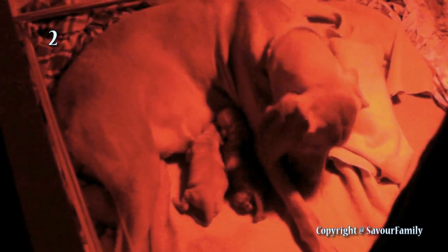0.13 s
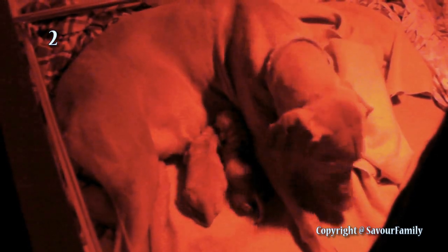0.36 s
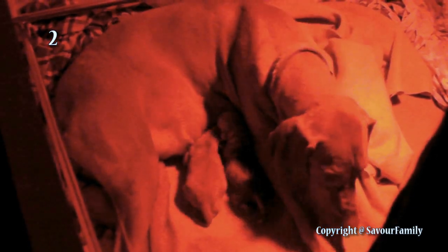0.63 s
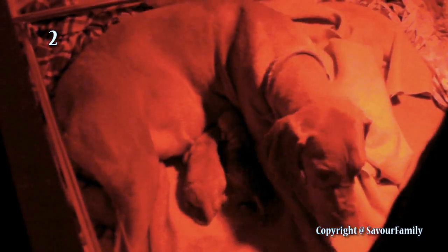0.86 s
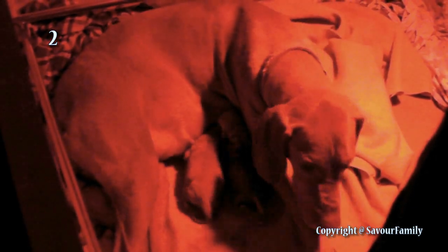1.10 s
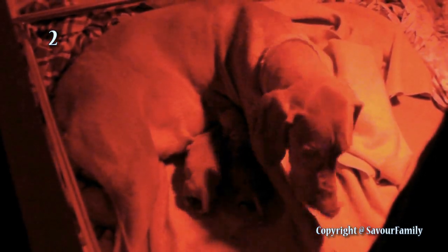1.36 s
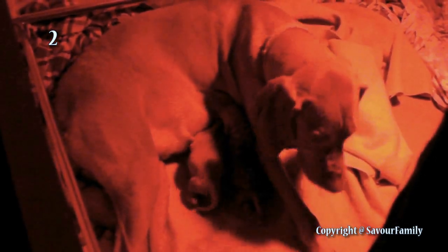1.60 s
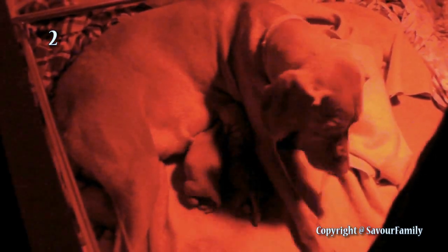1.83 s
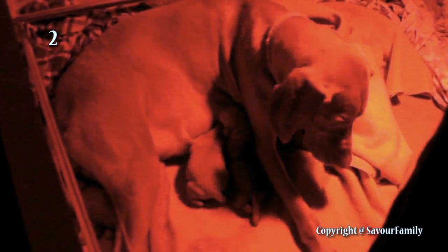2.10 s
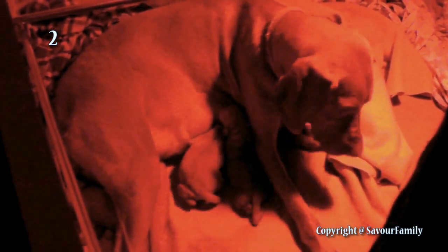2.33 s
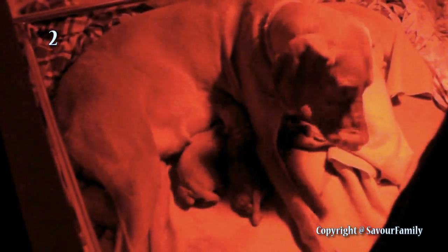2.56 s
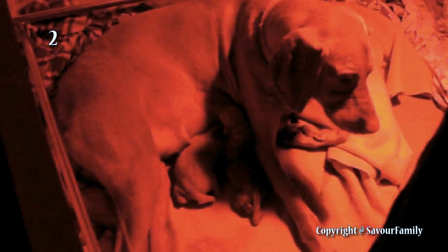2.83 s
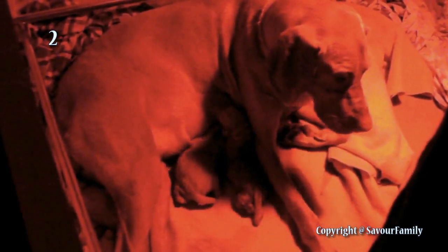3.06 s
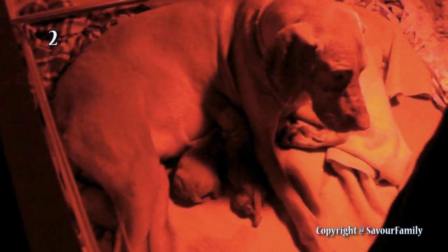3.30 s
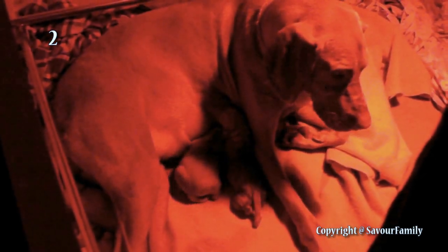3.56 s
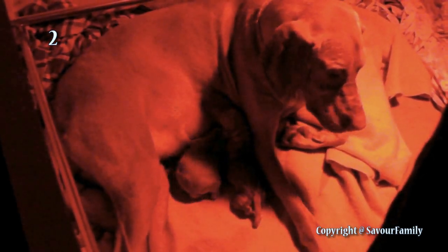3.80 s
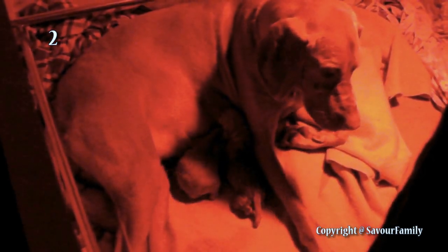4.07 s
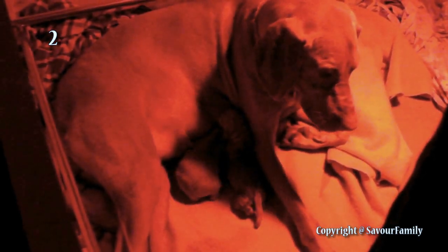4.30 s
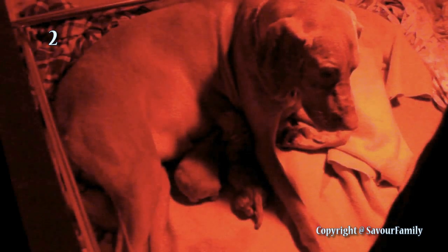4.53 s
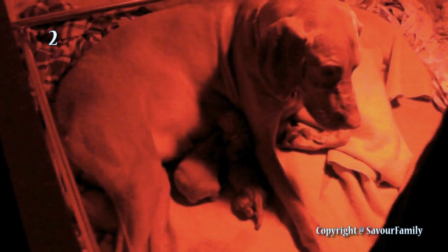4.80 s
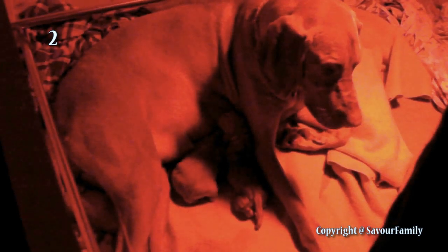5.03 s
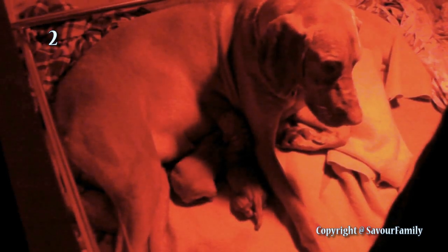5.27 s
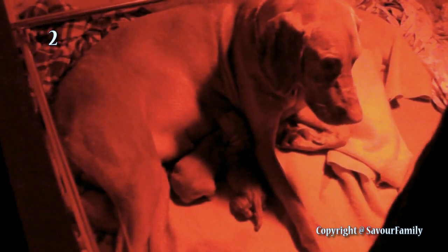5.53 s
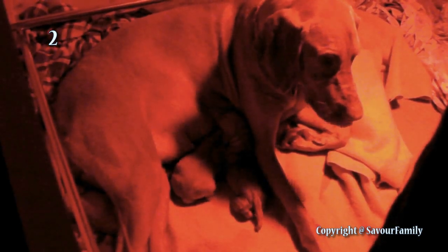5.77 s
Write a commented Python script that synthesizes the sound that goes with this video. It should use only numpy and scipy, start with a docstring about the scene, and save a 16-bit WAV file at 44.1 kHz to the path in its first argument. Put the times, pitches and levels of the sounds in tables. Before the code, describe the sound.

In a quiet indoor whelping box, the tail of an earlier cry fades under faint hiss and bedding rustle. A newborn puppy gives two brief hoarse mewls, then four longer wavering whimpers with small gulps, ending in a faint rising squeak. Light claw and tongue ticks and dull soft bumps come between. The microphone is close, the puppy central, with a slight boxy room ring.

```python
"""An earlier cry dies away over room noise, mains hum and rustling bedding in a whelping box.
A newborn puppy then mewls: two short cries, four long ones and a faint rising tail.
Its voice is a gliding harmonic stack with hoarse starts, brief dips, gulps and faint peeps; box and room ring on.
Decaying noise makes ticks of claws, tongue and bedding; decaying sines make paw or flank thumps."""
import sys
import numpy as np
from scipy import signal
from scipy.fft import rfft, irfft, next_fast_len
from scipy.io import wavfile
from scipy.ndimage import uniform_filter1d

SR = 44100
rng = np.random.default_rng(int(sys.argv[2]) if len(sys.argv) > 2 else 0)


def wav_out(sig):
    """Save sig, one row per channel (or a flat mono array), as 16-bit PCM at SR to the path in sys.argv[1]."""
    wavfile.write(sys.argv[1], SR, np.round(np.clip(np.atleast_2d(sig).T, -1, 1) * 32767).astype(np.int16))


def to_linear_factor(level_db):
    """Convert decibel levels (scalar or array-like) to linear amplitude factors."""
    exponent = np.asarray(level_db, float) / 20
    return 10 ** exponent


N = 259749

# room noise and hiss, relative density: freq_hz, density_db
AIR = [(18, -59), (30, -25), (95, -2), (287, -7), (415, 0.5), (684, -7.5), (1220, -18), (4780, -20),
       (7870, -27.5), (13700, -15), (16000, -30)]
# bedding rustle: time_s, level_db
RUSTLE = [(0.0, -57), (0.18, -62), (1.0, -65), (1.21, -57.5), (1.4, -57.5), (1.48, -63.5), (1.6, -58.5),
          (2.46, -61), (2.94, -54.5), (2.97, -60), (5.89, -60.5)]
# rustle spectrum, relative density: freq_hz, density_db
RUSTLE_COLOUR = [(800, -1), (2500, 0.5), (5000, 0), (15000, -6.5)]
# left-right likeness of the noises: freq_hz, correlation
LIKENESS = [(60, 0.29), (400, 0.54), (1500, 0.27), (6000, 0.011)]
# pitch and mouth track, one table per phrase: time_s, pitch_hz, effort_db, overtone_lift_db
CRIES = [
    [(.427, 430, -60, -20), (.441, 380.8, -43.5, -26), (.48, 338.4, -43, -8), (.505, 334, -41.5, -1),
     (.525, 357.3, -38.5, -7), (.546, 255.1, -32.5, -9.5), (.565, 265, -37.5, -8)],
    [(.984, 456.4, -48, -23), (1.006, 412.8, -46, -27), (1.028, 307, -48, -3), (1.046, 352.6, -38.5, -3),
     (1.09, 333, -46, 2), (1.105, 300, -33.5, -6.5), (1.12, 290, -32, -11)],
    [(1.582, 688, -53, -3), (1.608, 692, -51.5, 6), (1.625, 438, -54, -1), (1.655, 391.7, -52, 5),
     (1.685, 361.3, -53.5, 11.5), (1.735, 383.3, -47.5, 5.5), (1.8, 377, -45, 8.5), (1.828, 372.4, -45, 3),
     (1.854, 335.5, -37.5, 0), (1.878, 305.6, -47, 3.5), (1.95, 298.2, -37.5, -5.5)],
    [(2.392, 455, -50, -15), (2.408, 458.6, -51, -26), (2.434, 342, -44.5, 2.5), (2.462, 351, -38, -2),
     (2.494, 334, -40.5, 3.5), (2.522, 317, -44, 1.5), (2.546, 337.2, -43.5, 8), (2.568, 367, -39.5, 1),
     (2.588, 351.7, -38.5, -15), (2.622, 352.2, -32.5, -2), (2.668, 333.5, -41, 1), (2.738, 295.4, -35, -3),
     (2.78, 296.6, -32, -4), (2.872, 269.3, -65, 8), (2.9, 267.2, -31, -8), (2.94, 245.8, -31.5, -17.5)],
    [(3.32, 481.5, -46.5, -28), (3.348, 339.5, -34, -13), (3.424, 365.3, -42, -5.5),
     (3.466, 397.5, -41.5, -1), (3.488, 407.3, -37.5, -12), (3.58, 418.1, -38.5, 2),
     (3.612, 406.4, -38, -8), (3.62, 391, -38.5, 4), (3.68, 302.7, -37.5, -1.5), (3.725, 257.9, -41, -2.5),
     (3.82, 250.5, -43, -2.5), (3.848, 237.5, -48.5, -3), (3.91, 283.5, -47, 6), (3.958, 320.3, -52, 4.5),
     (4.035, 293.1, -43, 2.5), (4.048, 250, -39, -6.5)],
    [(4.597, 605.5, -52.5, -3), (4.629, 444.6, -45, -2.5), (4.661, 397.4, -45, -5), (4.724, 356.3, -44, 3),
     (4.8, 349.6, -36.5, -5), (4.87, 357.2, -39.5, 0), (4.897, 358, -55, 6), (4.909, 349, -38.5, 0),
     (4.946, 370.7, -48, 9), (5.02, 368.3, -42, 4.5), (5.07, 348.4, -39.5, 3.5), (5.09, 372, -39.5, -4),
     (5.108, 382, -36, -1), (5.128, 389.3, -34, -8), (5.155, 380.7, -34, -0.5), (5.176, 376, -34, -3.5),
     (5.196, 341.7, -37.5, 1), (5.212, 315.3, -40, -1), (5.286, 310.7, -43.5, 2), (5.39, 288, -34.5, -4),
     (5.425, 288, -64.5, 15), (5.445, 282.4, -48.5, 6)],
    [(5.464, 388.8, -56, -2), (5.485, 408.5, -48, 3), (5.518, 454.7, -48, -3), (5.592, 522.6, -52, -3)],
]
# hoarseness, one row per phrase: settled_0_to_1, settle_s
SETTLED = [(.22, .05), (.1, .04), (.07, .01), (.1, .04), (.1, .14), (.08, .01), (.3, .03)]
# lift of harmonics 4-9, one value per phrase: lift_db
BRIGHT_DB = [4, 3, 8, 4.5, 5.5, 1, 6]
# lift of harmonic 3, one value per phrase: lift_db
THIRD_DB = [1.5, 7, 0, 1.5, -0.5, -3, -13]
# throat and head radiation of harmonics 1-3: freq_hz, gain_db
HEAD = [(250, -29.5), (300, -23.5), (345, -8), (400, 7.5), (520, 3.5), (700, 1), (830, -9.5), (920, -5),
        (1100, -12), (1270, -11), (1450, -27)]
# colour of harmonics 4-9: freq_hz, gain_db
NASAL = [(900, 3.5), (1250, -17), (1500, -25), (1680, -27), (1850, -21), (2300, -30), (2700, -31),
         (3300, -41)]
# brief dips in the voice's level and pitch: centre_s, level_change_db, pitch_dip_share
DIPS = [(.998, -11, 0.011), (1.719, -9, 0.0099), (1.773, -25, 0.044), (3.345, -9.5, 0.031),
        (3.437, -4, 0.013), (4.699, -5, 0.017), (4.966, -8, 0.0028), (5.043, -25, 0.02),
        (5.105, -7, 0.0084), (5.18, -15, 0.0047)]
# gulps, a few cycles of the closed throat: time_s, level_db, pitch_hz, cycles
GULPS = [(0.48, -30, 449, 1.44), (1.015, -33.5, 449, 2.3), (1.36, -41, 460, 1), (1.029, -32, 452, 1.4),
         (1.947, -30, 406, 1.45), (2.207, -29.5, 490.5, 0.82), (2.927, -32.5, 453, 2.04),
         (3.419, -29.5, 492.6, 1.26), (4.044, -33.5, 413, 1.8), (5.455, -39, 582.8, 1.9),
         (5.663, -52, 529.4, 2.8), (5.765, -46, 475.6, 1.5)]
# faint short tones: start_s, peak_db, pitch_hz, length_s
PEEPS = [(1.185, -58.5, 2760, 0.046), (5.804, -43.5, 893, 0.015), (5.803, -57.5, 2200, 0.01),
         (5.806, -55, 2750, 0.0096), (5.876, -56, 2050, 0.0079)]
# air modes of the whelping box: freq_hz, added_gain_db, t60_s
BOX = [(358, 7, 0.3), (742, -3, 0.5), (1110, -4, 0.4)]
# room decay: freq_hz, t60_s
ROOM_T60 = [(250, 0.69), (600, 0.73), (1200, 0.94), (5000, 0.06)]
# ticks of claws, tongue and bedding: start_s, level_db, centre_hz
TICKS = [(1.268, -46, 6000), (1.301, -45, 4390), (1.3087, -44, 4300), (1.346, -42, 5050),
         (1.394, -46, 4554), (1.402, -51, 12540), (1.698, -39, 8300), (2.0912, -50, 3920),
         (2.13, -47.5, 7600), (2.283, -46, 5880), (2.3458, -48.5, 4360), (2.7267, -47, 3454),
         (2.7826, -49.5, 7030), (2.8893, -37, 6760), (3.625, -43.5, 5060), (3.815, -45.5, 5180),
         (3.8465, -40.5, 2898), (4.0644, -49, 9300), (5.659, -46.5, 4930)]
# paw or flank on the box: start_s, level_db, pitch_hz
THUMPS = [(1.398, -49.5, 212), (1.619, -54.5, 183), (2.21, -48.5, 217), (4.611, -58, 90.5)]
# echo path lengths, rows for middle and sides: twelve delays_ms each
PATHS_MS = np.geomspace(9, 61, 24).reshape(12, 2).T

AIR_DB, HUM_DB, HUM_HZ = -61.5, -75, 100
CRACKLES_PER_S, CRACKLE_S = 37, 0.012
CRACKLE_DB, CRACKLE_SPREAD_DB = -14, 3.5  # level against the rustle; scale of the uneven sizes
LAST_CRY_DB, ROOM_DB, ROOM_WIDTH = -52, -22.5, 0.16
RAW_START = .6  # hoarseness at each phrase start
SLACK_HZ, SLACK_PER_HZ, SLACK_MOST = 290, .008, .22  # slack folds add hoarseness below SLACK_HZ
MOUTH_GROWS, MOUTH_UPPER = 0.48, 1.35  # extra mouth share in harmonic 3; mouth share in 4-9
UPPER_DB, HOARSE_DULLS_DB = -8.5, -16  # harmonics 4-9: base level; change at hoarseness 1
WARM_DB, WARM_S = -9.5, 0.11  # harmonics above 2 start weaker and grow in
DIP_S, DIP_OVERTONES = 0.01157, .35  # Gaussian half length; share felt by overtones
HAZE_DB = -30
TOP_HZ = 16200


def rms_one(x):
    """Scales to rms 1."""
    return x / np.sqrt(np.mean(x ** 2) + 1e-20)


def in_time(rows):
    """Table columns interpolated to one value a sample."""
    time_s, *columns = np.transpose(rows)
    return [np.interp(np.arange(N) / SR, time_s, column) for column in columns]


def at_hz(points, hz):
    """Reads a spectrum on a log frequency axis."""
    freq_hz, value = np.array(points).T
    return np.interp(np.log(hz), np.log(freq_hz), value)


def band(x, low_hz, high_hz):
    """Butterworth band-pass."""
    return signal.sosfilt(signal.butter(2, [low_hz, min(high_hz, 18000)], "band", fs=SR, output="sos"), x)


def drift(rate_hz):
    """Slow random signal, rms about 1: two-pole low-passed noise made at SR / 20."""
    r = np.exp(-40 * np.pi * rate_hz / SR)
    slow = signal.lfilter([1], [1, -2 * r, r * r], rng.standard_normal(N // 20 + 4002))[4000:]
    return np.interp(np.arange(N) / 20, np.arange(len(slow)), rms_one(slow))


def last_cry():
    """The room still rings from an earlier cry: band noise decaying 75 dB/s."""
    mid, side = band(rng.standard_normal((2, N)), 340, 720)
    decay = to_linear_factor(LAST_CRY_DB - 75 * np.arange(N) / SR)
    return decay * rms_one(mid + 0.13 * side * [[1], [-1]])


def banded_noise(spectrum, patchy_db):
    """Half-octave bands of stereo noise, each with its own level, flicker and likeness; rms 1."""
    out, together = 0, drift(8)
    edges_hz = 24 * 2 ** np.arange(0, 9.6, .5)
    white = rng.standard_normal((2, 2, N))
    for k, (low_hz, high_hz) in enumerate(zip(edges_hz, edges_hz[1:])):
        mid, side = band(white[k % 2], low_hz, high_hz)
        hz = np.sqrt(low_hz * high_hz)
        alike = np.clip(at_hz(LIKENESS, hz), -1, 1)
        flicker_db = patchy_db * (together + 0.51 * drift(13))
        gain = to_linear_factor(at_hz(spectrum, hz) + flicker_db)
        out = out + gain * (np.sqrt(1 + alike) * mid + np.sqrt(1 - alike) * side * [[1], [-1]])
    return rms_one(out)


def hum():
    """A mains hum: one sine wavering in level and phase."""
    phase = 2 * np.pi * HUM_HZ * np.arange(N) / SR
    level = np.sqrt(2) * to_linear_factor(HUM_DB + 2.5 * drift(8.7))
    return level * np.sin(phase + 0.5 * drift(16.0))


def crackle():
    """Fibres scuff in the bedding: sparse dying noise puffs of uneven size and colour; rms 1."""
    size = to_linear_factor(CRACKLE_SPREAD_DB * np.minimum(rng.exponential(1, N), 3))
    snaps = (rng.random(N) < CRACKLES_PER_S / SR) * size
    dealt, white = rng.integers(0, 4, N), rng.standard_normal(N)
    fade = [1, -np.exp(-1 / (CRACKLE_S * SR))]
    out = 0
    for k, low_hz in enumerate(np.geomspace(2500, 9000, 4)):
        envelope = signal.lfilter([1], fade, snaps * (dealt == k) + 1e-18)
        out = out + envelope * band(white, low_hz, 1.38 * low_hz)
    return rms_one(out)


def bedding():
    """Bedding rustle: patchy noise plus crackle under one drifting level."""
    level = to_linear_factor(in_time(RUSTLE)[0] + 1.31 * drift(8.0))
    scuffs = to_linear_factor(CRACKLE_DB) * crackle() * to_linear_factor([[-1.5], [1.5]])
    return level * (banded_noise(RUSTLE_COLOUR, patchy_db=1.0) + scuffs)


def hoarseness(hz):
    """Each phrase starts raw, settles abruptly and roughens as the pitch sags and the folds slacken."""
    t, out = np.arange(N) / SR, np.zeros(N)
    for phrase, (settled, settle_s) in zip(CRIES, SETTLED):
        start_s = phrase[0][0]
        since = np.maximum(t - start_s, 0) / settle_s
        out = np.where(t >= start_s, settled + (RAW_START - settled) / (1 + since ** 6), out)
    slack = np.clip(SLACK_PER_HZ * (SLACK_HZ - hz), 0, SLACK_MOST)
    return np.minimum(out + slack, .9)


def brief_dips():
    """Brief Gaussian dips in the voice: level in dB, pitch as a share."""
    t = np.arange(N) / SR
    return sum(np.outer([db, share], np.exp(-((t - centre_s) / DIP_S) ** 2))
               for centre_s, db, share in DIPS)


def harmonic_levels(hz, effort_db, mouth_db, dip_db, hoarse):
    """Levels in dB of harmonics 1-9, shaped by effort, mouth opening, head and nasal colour."""
    rows = [(row[0], upper_db, third_db, row[0] - phrase[0][0])
            for phrase, upper_db, third_db in zip(CRIES, BRIGHT_DB, THIRD_DB) for row in phrase]
    bright_db, third_db, since_s = in_time(rows)
    warm_db = WARM_DB * np.exp(-since_s / WARM_S)
    overtones_db = mouth_db - (1 - DIP_OVERTONES) * dip_db
    levels = []
    for k in range(1, 4):
        mouth_share = (k > 1) + MOUTH_GROWS * (k > 2)
        levels.append(effort_db + at_hz(HEAD, k * hz) + mouth_share * overtones_db)
    levels[2] = levels[2] + third_db + warm_db
    upper_db = effort_db + MOUTH_UPPER * overtones_db + bright_db + warm_db + HOARSE_DULLS_DB * hoarse
    return levels + [upper_db + UPPER_DB + at_hz(NASAL, k * hz) for k in range(4, 10)]


def voice(tremor, jitter, shimmer_db, breath_db):
    """Harmonics on a gliding pitch; hoarseness shakes pitch and strength and adds breath puffed once a cycle."""
    hz, effort_db, mouth_db = in_time(np.concatenate(CRIES))
    hoarse = hoarseness(hz)
    dip_db, sag = brief_dips()
    sounding = np.zeros(N)
    for phrase in CRIES:
        sounding[int(phrase[0][0] * SR):int((phrase[-1][0] + .012) * SR)] = 1
    sounding = uniform_filter1d(sounding, size=130) * to_linear_factor(dip_db)
    hz = hz * (1 - sag)
    shaken_hz = hz * (1 + tremor * drift(20.2) + jitter * hoarse * drift(70.3))
    phase = 2 * np.pi * np.cumsum(shaken_hz) / SR
    levels = harmonic_levels(hz, effort_db, mouth_db, dip_db, hoarse)
    tone = 0
    for k, db in enumerate(levels, 1):
        # higher harmonics break up more
        unsteady = hoarse + 0.22 * k * (k > 1) + 0.36 * (k > 3)
        strength = np.sqrt(2) * to_linear_factor(db + shimmer_db * unsteady * np.tanh(drift(29.0)))
        wander = (0.095 + 0.26 * hoarse * (k > 3)) * k * drift(22.3)
        tone = tone + strength * np.sin(k * phase - 0.91 * k + wander)
    effort = np.sqrt(sum(to_linear_factor(db) ** 2 for db in levels))
    puff = 1 + np.sin(phase)
    breath = rms_one(band(band(rng.standard_normal(N) * puff, 407, 767), 410, 1070))
    haze = rms_one(band(rng.standard_normal(N) * puff ** 2, 940, 2680))
    breath = to_linear_factor(breath_db) * hoarse * effort * breath
    haze = to_linear_factor(HAZE_DB - HOARSE_DULLS_DB * hoarse) * effort * haze  # thicker when hoarse
    return sounding * (tone + breath + haze)


def box(x):
    """Air modes ring on after the pitch has moved away: two-pole resonators."""
    out = 0
    for hz, db, t60_s in BOX:
        r = to_linear_factor(-60 / (t60_s * SR))
        zeros = np.array([1, 0, -1]) * (1 - r * r) / 2
        poles = [1, -2 * r * np.cos(2 * np.pi * hz / SR), r * r]
        out = out + to_linear_factor(db) * signal.lfilter(zeros, poles, x + 1e-18)
    return out


def room(x):
    """Twelve circulating paths each for middle and sides, decay set by frequency, then two all-pass scatterers."""
    size = next_fast_len(N + SR)
    hz = np.arange(size // 2 + 1) * SR / size + 1e-3
    spectrum, t60_s, out = rfft(x, size), at_hz(ROOM_T60, hz), []
    for paths in PATHS_MS:
        echo = 0
        for k, ms in enumerate(paths):
            loop = to_linear_factor(-60 * ms / 1000 / t60_s) * np.exp(-2j * np.pi * hz * ms / 1000)
            echo = echo + (-1) ** k * loop / (1 - loop)
        for ms in paths[:2]:
            lag = np.exp(-2j * np.pi * hz * ms / 9000)  # a ninth of the path
            echo = echo * (lag - .6) / (1 - .6 * lag)
        out.append(irfft(spectrum * echo, size)[:N])
    mid, side = out  # close microphones: echoes mostly shared
    return mid + (ROOM_WIDTH * side + 0.75 * band(side, 1170, 3300)) * [[1], [-1]]


def small_head(x, low_hz):
    """So small a head radiates little bass: high-pass."""
    return signal.sosfilt(signal.butter(4, low_hz, "high", fs=SR, output="sos"), x)


def gulps():
    """Closed-throat wave packets, quick to rise, dying in a few cycles."""
    out = np.zeros(N + SR)
    for s, db, hz, cycles in GULPS:
        u = np.arange(int(4 * cycles / hz * SR)) / SR * hz  # elapsed cycles
        rise = 0.62 * u / cycles
        at = int((s - .003) * SR)
        out[at:at + len(u)] += to_linear_factor(db) * (rise * np.exp(1 - rise)) ** 2 * np.sin(2 * np.pi * u)
    return small_head(out[:N], low_hz=324)


def peeps():
    """Brief sines with wavering phase and rounded ends."""
    out, waver = np.zeros(N + SR), drift(26)
    for s, db, hz, length_s in PEEPS:
        t = np.arange(int(length_s * SR)) / SR
        at = int(s * SR)
        shape = np.sqrt(np.sin(np.pi * t / length_s))
        out[at:at + len(t)] += to_linear_factor(db) * shape * np.sin(2 * np.pi * hz * t + 1.2 * waver[:len(t)])
    return out[:N]


def ticks(crack_s, tail_s, tail_db, wide_db):
    """Sharp crack and softer scuffing tail: noise around each centre plus broad noise, both decaying."""
    out, t = np.zeros(N + SR), np.arange(SR // 5) / SR
    noise = rng.standard_normal((len(TICKS), len(t)))
    shape = np.exp(-t / crack_s) + to_linear_factor(tail_db) * np.exp(-t / tail_s)
    for (s, db, hz), white in zip(TICKS, noise):
        narrow = rms_one(band(white, hz / 1.31, hz * 1.215))
        wide = to_linear_factor(wide_db) * rms_one(band(white, 1900, 13400))
        at = int(s * SR)
        out[at:at + len(t)] += to_linear_factor(db - 5.5) * (narrow + wide) * shape
    return out[:N]


def thumps():
    """Dull knocks: sines that die in a few cycles."""
    out, t = np.zeros(N + SR), np.arange(SR // 10) / SR
    for s, db, hz in THUMPS:
        at = int(s * SR)
        out[at:at + len(t)] += to_linear_factor(db) * np.sin(2 * np.pi * hz * t) * np.exp(-t * hz / 2.3)
    return out[:N]


def scene():
    """Puppy near the middle; ticks, bedding and air a little to the right."""
    air = to_linear_factor(AIR_DB) * banded_noise(AIR, patchy_db=.35) + hum()
    rustle = bedding()
    puppy = voice(tremor=0.00411, jitter=0.02543, shimmer_db=4.0, breath_db=-3) + gulps() + peeps()
    puppy = puppy + box(puppy)
    clicks = ticks(crack_s=0.0011, tail_s=0.009, tail_db=-8, wide_db=-5)
    around = (clicks * to_linear_factor([[-1.2], [1.2]]) + rustle + air) * to_linear_factor([[-.6], [.6]])
    echoes = to_linear_factor(ROOM_DB) * room(puppy + clicks)
    return puppy * to_linear_factor([[-.3], [.3]]) + echoes + last_cry() + thumps() + around


def low_pass(x):
    """Removes everything above the highest recorded frequency."""
    return signal.sosfilt(signal.butter(12, 16300, fs=SR, output="sos"), x)


def record(dry):
    """Cuts the top with a steep low-pass."""
    mix = signal.sosfilt(signal.cheby2(14, 60, TOP_HZ, fs=SR, output="sos"), dry)
    return low_pass(mix)


dry = scene()
out = record(dry)
wav_out(out)
```